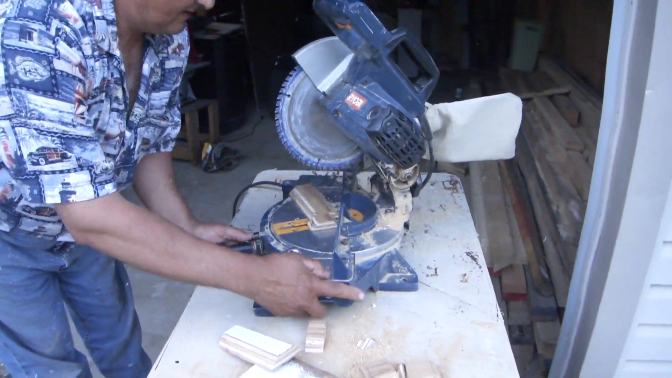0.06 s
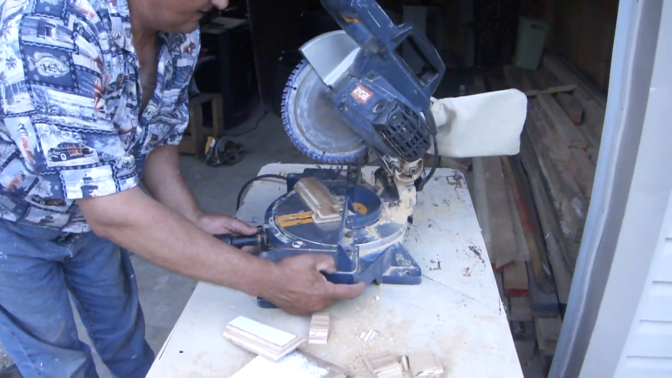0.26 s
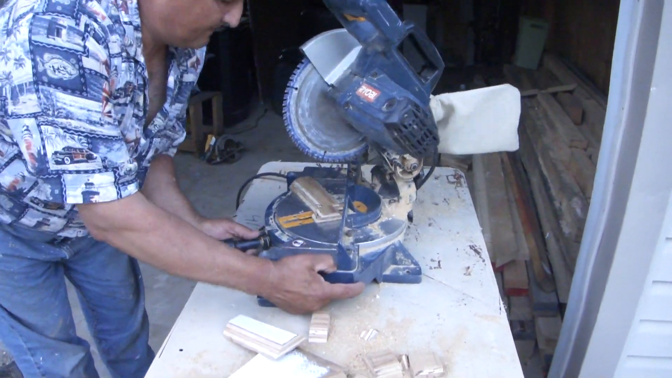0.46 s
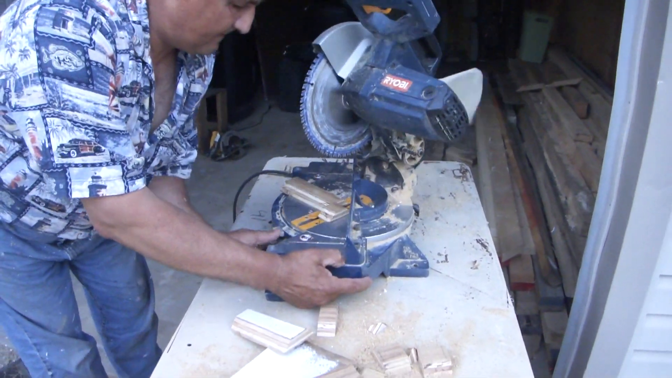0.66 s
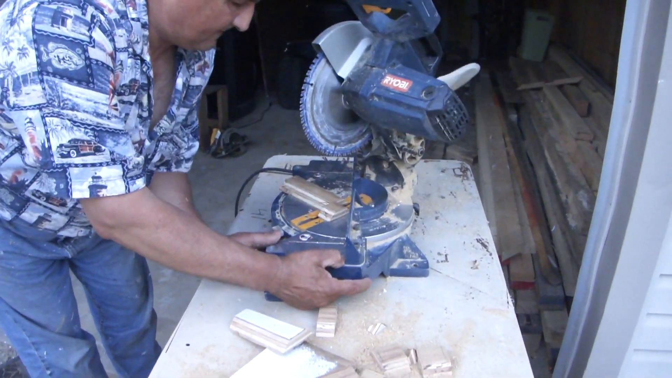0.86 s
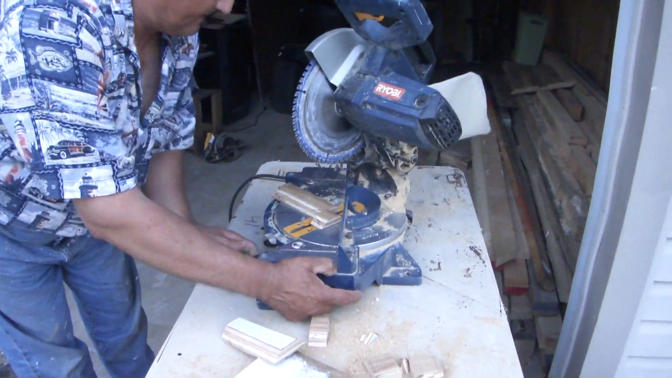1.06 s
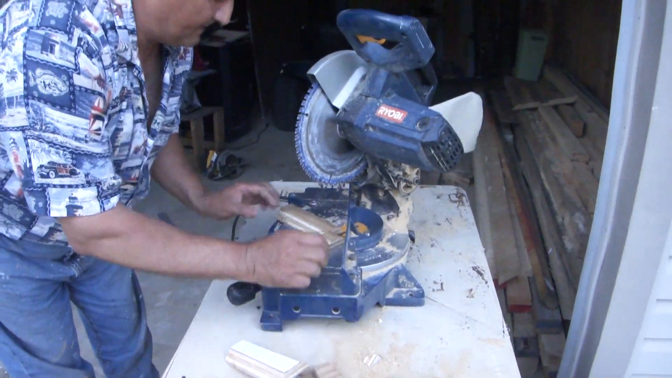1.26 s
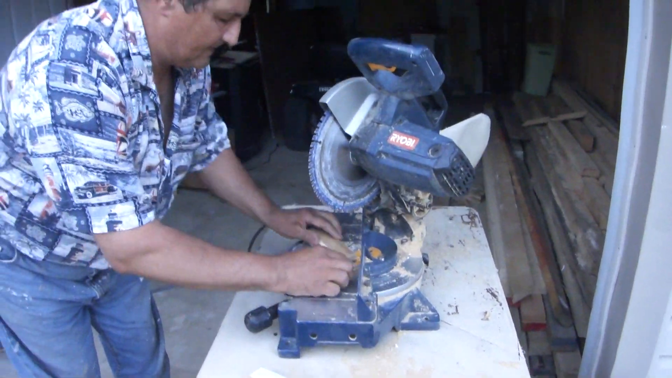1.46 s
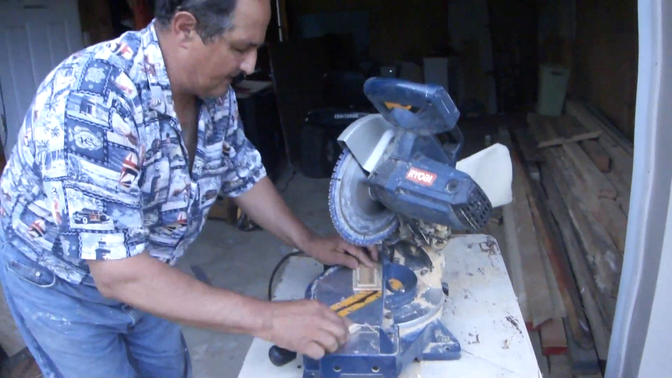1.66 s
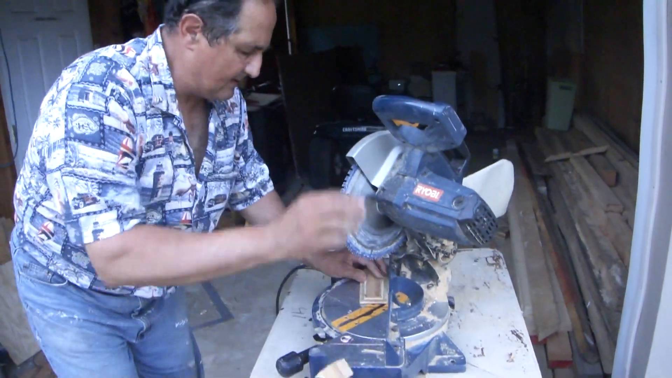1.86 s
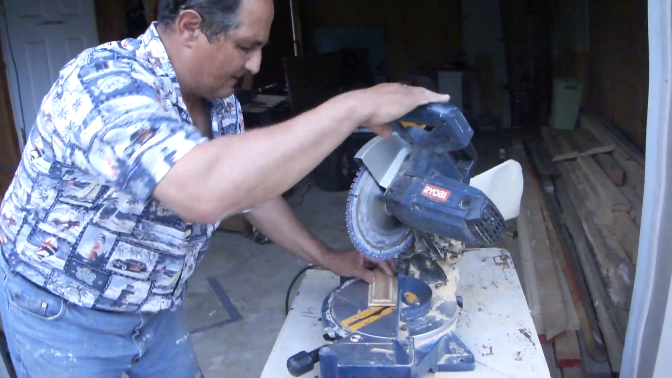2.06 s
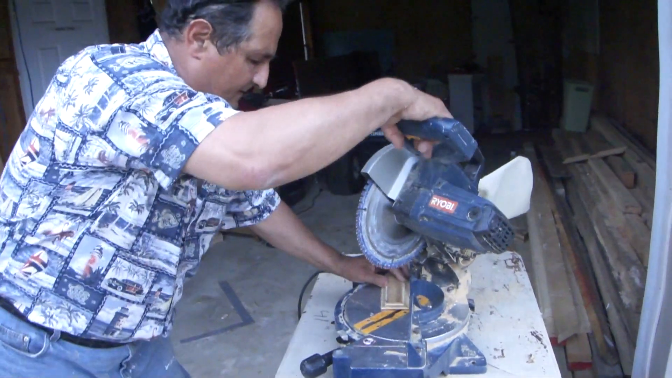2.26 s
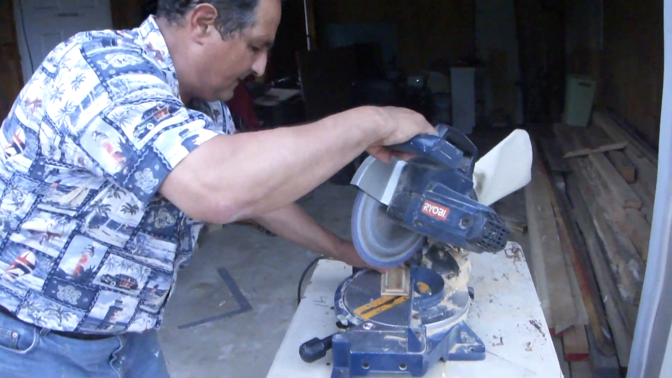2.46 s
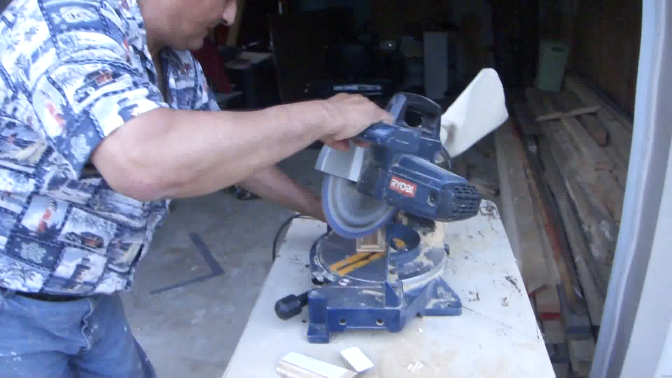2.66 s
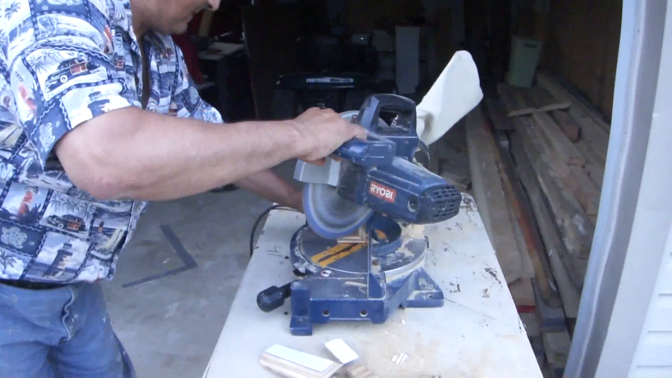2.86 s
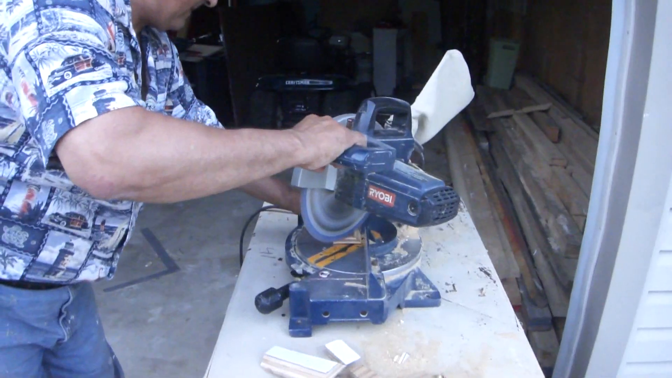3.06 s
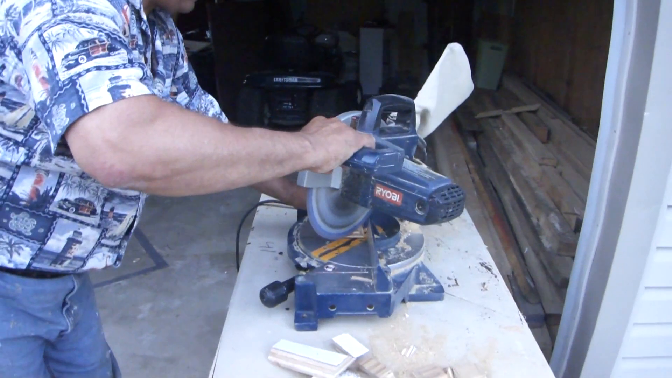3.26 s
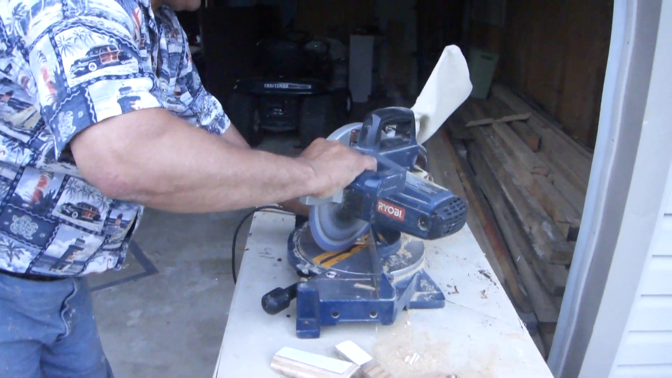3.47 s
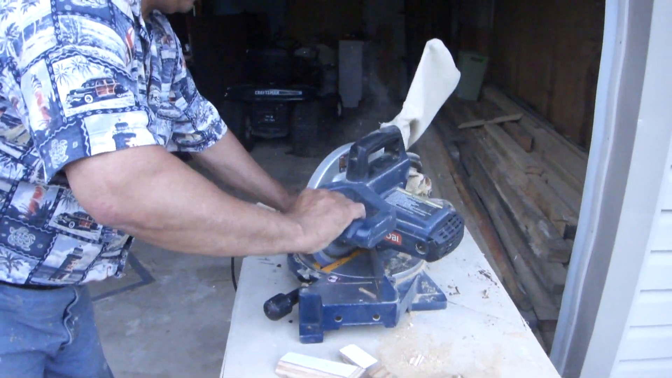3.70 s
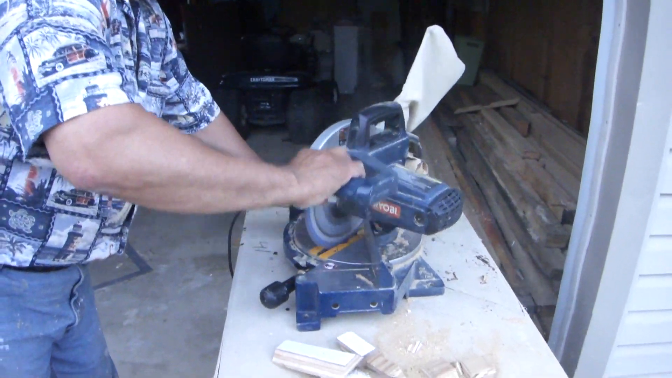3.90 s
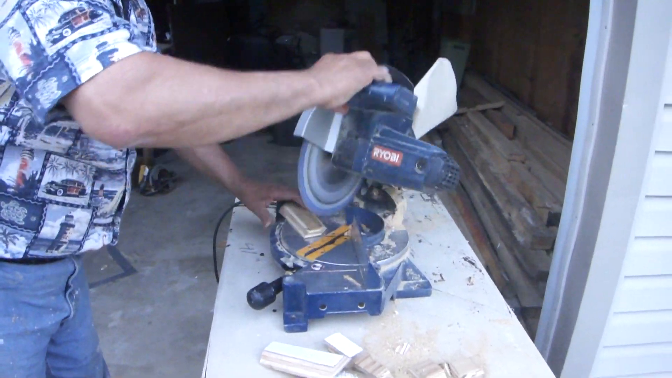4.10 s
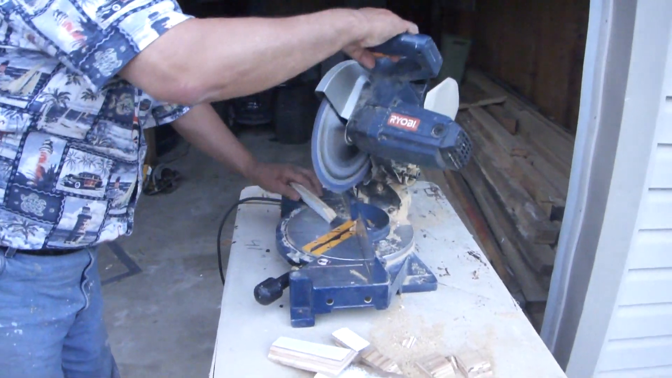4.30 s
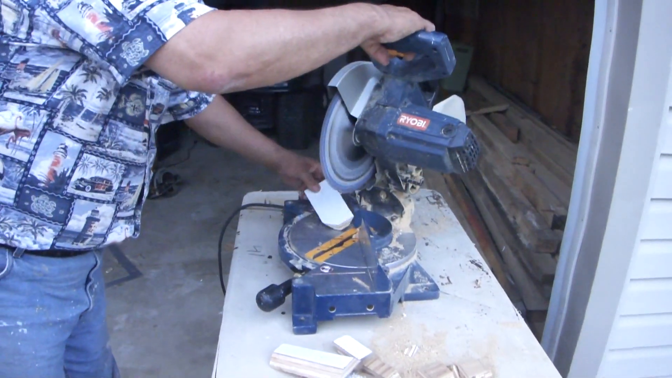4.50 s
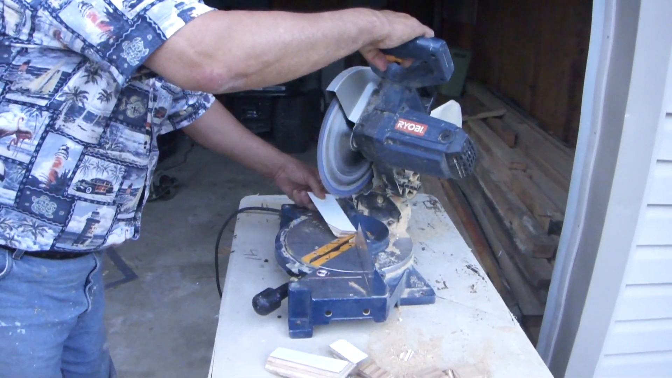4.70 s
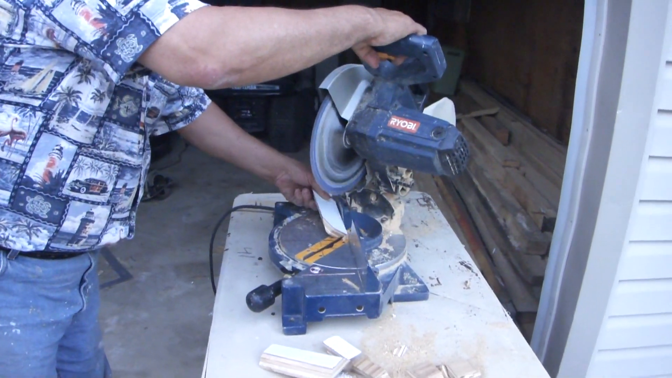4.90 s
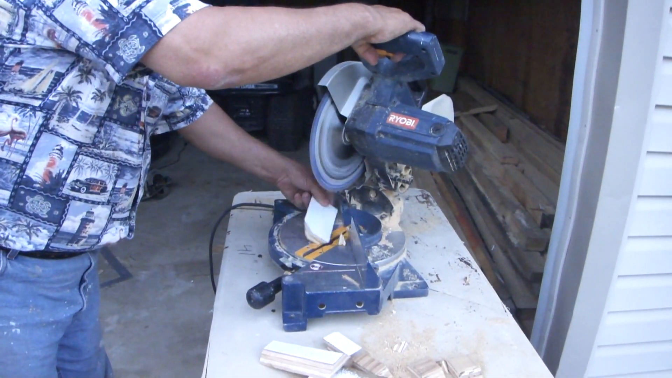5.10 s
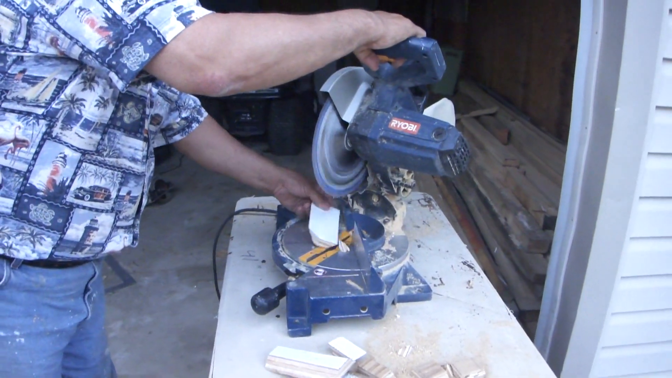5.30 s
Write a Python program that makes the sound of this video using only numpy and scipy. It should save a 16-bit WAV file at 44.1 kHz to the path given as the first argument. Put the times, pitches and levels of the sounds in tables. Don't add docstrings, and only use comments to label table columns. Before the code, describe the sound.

In a garage with its door open to faint traffic, a heavy tool base knocks and scrapes over a bench. A sharp clack, then an electric mitre saw starts with a rough growl and rising whine, bites briefly through a small block, and brakes, its blade singing as it slows. Camera microphone a few steps away, dipping in level while the saw is loud.

```python
import sys
import numpy as np
from scipy import signal
from scipy.fft import rfft, irfft, next_fast_len
from scipy.io import wavfile
from scipy.ndimage import uniform_filter1d

SR = 44100
rng = np.random.default_rng(int(sys.argv[2]) if len(sys.argv) > 2 else 0)


def transcribe(signal):
    frames = np.atleast_2d(signal).T
    limited = np.clip(frames, -1, 1)
    pcm = np.round(limited * 32767).astype(np.int16)
    wavfile.write(sys.argv[1], SR, pcm)


def field_ratio(decibels):
    return 10 ** (np.asarray(decibels, dtype=float) / 20)


N = 235798
t = np.arange(N) / SR
SIZE = next_fast_len(N + SR)
FREQ = np.maximum(np.arange(SIZE // 2 + 1) * SR / SIZE, 1)

SWITCH_ON_S, BITE_S, BRAKE_S = 2.468, 3.47, 3.915
FREE_HZ = 350
# [f/Hz, width/Hz, level/dB]
HOUSING_MODES = [(550, 160, -4.5), (842, 47, 5.5), (1010, 73, 3.5), (1555, 46, -1), (2135, 62, 0),
                 (2420, 58, 2.5)]


def level(x):
    return x / np.sqrt(np.mean(x ** 2))


def colour(x, spectrum, share=1):
    hz, db = np.transpose(spectrum)
    gain = field_ratio(share * np.interp(np.log(FREQ), np.log(hz), db))
    return irfft(rfft(x, SIZE) * gain, SIZE)[..., :N]


def band_level(x, lo_hz, hi_hz):
    power = np.abs(rfft(x, SIZE)) ** 2
    in_band = (FREQ > lo_hz) & (FREQ < hi_hz)
    return level(x) * np.sqrt(power.sum() / power[..., in_band].sum())


def resonate(x, hz, width_hz):
    r = np.exp(-np.pi * width_hz / SR)
    return signal.lfilter([1 - r, 0, r - 1], [1, -2 * r * np.cos(2 * np.pi * hz / SR), r * r], x)


def walk(rate):
    k = max(int(SR / rate), 1)
    steps = np.repeat(rng.standard_normal(N // k + 1), k)
    return level(uniform_filter1d(uniform_filter1d(steps, k), k)[:N])


def curve(table, column, fade_s=0.002):
    s, db = np.array(table)[:, 0], np.array(table)[:, column]
    inside = np.clip(np.minimum(t - s[0], s[-1] + fade_s - t) / fade_s, 0, 1)
    return field_ratio(np.interp(t, s, db)) * inside


def grains(spread_db):
    return rng.standard_normal(N) * field_ratio(spread_db * walk(400))


def since(s, tau):
    return (t >= s) * np.exp(-np.maximum(t - s, 0) / tau)


def stroke(s, rise, fall):
    bend = 1.8
    return field_ratio(-20 * np.where(t < s, (s - t) / rise, (t - s) / fall) ** bend)


def yard():
    # [f/Hz, level/dB]
    yard_colour = [(15, -69), (25, -8), (159, -2), (322, -12.5), (366, -11.5), (528, -13), (617, -5),
                   (844, -11), (936, -5), (1090, -9.5), (1310, -6.5), (2270, -16), (3190, -21), (4840, -30),
                   (12700, -43.5), (16500, -88), (22000, -120)]
    # [f/Hz, width/Hz, level/dB]
    far_hum = [(157, 28, -8.5), (577, 0.68, -6)]
    mid = field_ratio(1.0 * walk(2.8)) * rng.standard_normal(N)
    side = 0.44 * rng.standard_normal(N)
    air = band_level(colour(np.array([mid + side, mid - side]), yard_colour), 72, 250)
    hum = sum(field_ratio(db) * level(resonate(mid, hz, width)) for hz, width, db in far_hum)
    return field_ratio(-40.5) * (air + hum)


def garage(x):
    dull_t60_s, hiss_t60_s = 0.085, 0.2
    u = np.arange(int(.6 * SR)) / SR
    noise = rng.standard_normal((2, len(u))) * (u > .004)
    dull = uniform_filter1d(noise, size=9)
    tail = 2 * dull * np.exp(-np.log(1000) * u / dull_t60_s)
    tail = tail + (noise - dull) * np.exp(-np.log(1000) * u / hiss_t60_s)
    tail = colour(tail / np.sqrt(np.sum(tail ** 2) / 2),
                  [(100, -7), (500, -9.5), (1500, -8.0), (5000, 0.0), (9000, 7.0), (11000, 6.0), (12000, 2)])
    return irfft(rfft(tail, SIZE) * rfft(x, SIZE), SIZE)[:, :N]


def scrapes():
    # [hardest t/s, build-up/s, let-go/s, body level/dB, grit level/dB]
    pushes = [(.6, 0.063, 0.13, -33.5, -32.5), (0.756, 0.094, 0.086, -20.5, -24),
              (0.841, 0.012, 0.11, -26, -38), (1.19, 0.18, 0.2, -38, -36),
              (1.545, 0.012, 0.049, -52, -33.5), (1.64, 0.078, 0.15, -38.5, -34.5),
              (1.77, 0.14, 0.088, -48, -38.5), (1.9, 0.12, 0.27, -44.5, -49.5),
              (2.085, 0.017, 0.086, -23.5, -69), (2.19, 0.071, 0.088, -42, -45),
              (2.3, 0.66, 0.83, -35.5, -46), (2.467, 0.039, 0.018, -40.5, -29.5)]
    # [t/s, f/Hz, width/Hz, level/dB]
    squeaks = [
        (1.556, 8400, 300, -44),
        (1.71, 7250, 300, -37),
        (1.765, 4750, 150, -41),
        (1.757, 9500, 350, -41),
        (1.78, 9200, 300, -44),
    ]
    # [f/Hz, level/dB]
    drag_colour = [(71, -53), (120, -10.5), (513, 4), (708, -12), (820, 7), (896, -2), (1500, -4),
                   (1980, -11), (2190, -10.5), (4000, -35), (5200, -51), (8800, -120)]
    # [f/Hz, level/dB]
    grit_colour = [(1470, 2), (2500, 5), (2920, 4), (4020, -4.5), (4700, -1), (6560, -4), (7320, -4.5),
                   (9940, -9), (12700, -19.5), (16500, -57), (22000, -120)]
    drag = band_level(colour(grains(3.0), drag_colour), 300, 2500)
    grit = band_level(colour(grains(2.7), grit_colour), 3640, 13000)
    out = 0
    for s, hz, width, db in squeaks:
        out = out + field_ratio(db) * stroke(s, .018, .018) * level(resonate(grit, hz, width))
    for s, rise, fall, body_db, grit_db in pushes:
        out = out + stroke(s, rise, fall) * (field_ratio(body_db) * drag + field_ratio(grit_db - 6.5) * grit)
    return out


def wood_knock(u, db, hz, crack_db):
    # [multiple of the body pitch, level/dB]
    wood = [(.62, -6), (1, 0), (1.37, -4), (1.9, -8), (2.7, -14)]
    fall = np.log(1000) * u / 0.083
    body = 0
    for multiple, mode_db in wood:
        detune = 1 + .04 * rng.standard_normal()
        tone = np.sin(2 * np.pi * hz * multiple * detune * u)
        body = body + field_ratio(mode_db) * tone * np.exp(-fall * multiple ** 1.1)
    noise = rng.standard_normal((3, len(u)))
    tail = level(resonate(resonate(noise[0], hz * 0.93, hz * 1.4), hz, hz * 0.91)) * np.exp(-fall * 0.61)
    blow = level(resonate(resonate(noise[1], 1760, 2000), 1700, 2000)) * np.exp(-u / 0.0032)
    crack = resonate(noise[2], 3200, 4400) * np.exp(-u / 0.0047)
    return field_ratio(db) * (0.43 * body + 0.5 * tail + 0.7 * field_ratio(0.21 * crack_db) * blow + 4 * field_ratio(crack_db) * crack)


def knocks():
    # [t/s, peak level/dB, body f/Hz, crack level/dB]
    wood_hits = [(0.09, -24.5, 450, -19), (0.506, -23.5, 427, -36), (0.537, -32, 650, -10),
                 (0.574, -28, 1390, -38), (0.594, -20.5, 1440, -45), (0.663, -22.5, 1450, -34.5),
                 (0.716, -37, 860, -16), (0.733, -14.5, 900, -1.5), (0.745, -9, 996, -30),
                 (0.754, -11, 1340, -14), (0.761, -8, 1150, -32), (0.773, -10, 870, -20),
                 (0.794, -8.5, 845, -15.5), (0.819, -13.5, 1010, -41), (0.83, -15.5, 1010, -35),
                 (0.854, -30, 433, -12), (1.096, -24, 827, -26), (1.1372, -7, 725, -36),
                 (1.218, -30, 700, -21), (1.236, -20, 617, -22), (1.522, -23, 457, -14),
                 (1.536, -34, 448, -36), (2.0654, -2, 523, -36), (2.155, -7.5, 570, -50),
                 (2.172, -17.5, 536, -18), (2.35, -11, 577, -99), (2.47, -7, 1018, -11.5),
                 (3.911, -14, 2116, -12), (4.678, -12, 1293, -28), (4.706, -31, 1210, -25)]
    # [f/Hz, level/dB, t60/s]
    latch_modes = [(3230, 13, 0.035), (3570, 10, 0.032), (4100, -6, 5.0), (5020, 12, 0.029),
                   (8199, -21, 0.034)]
    # [t/s, level/dB]
    latch_hits = [
        (0.733, -13.5),
        (1.137, -30),
        (2.156, -58),
    ]
    # [t/s, f/Hz, level/dB, decay/s]
    snaps = [(0.5042, 950, -16.5, 0.0013), (0.5377, 1100, -21, .001), (.664, 1420, -14.5, 0.004),
             (0.7517, 1300, -9, .002), (0.7603, 1210, -3.5, 0.0024), (0.796, 1840, -17, 0.0017),
             (0.8197, 910, -13, 0.0035), (0.858, 2780, -22, 0.0043), (1.1363, 875, -6.5, 0.0032),
             (1.1369, 2070, -7.5, 0.0027), (1.2155, 740, -21, 0.0044), (2.0651, 1840, -0.5, 0.0013),
             (2.1546, 7400, -12.5, 0.0005), (2.1555, 5550, -20, .001), (2.351, 900, -12, 0.0028),
             (4.6752, 1070, -8, 0.0043), (4.677, 2250, -10, .0016), (4.6768, 6000, -16, .0012),
             (4.7055, 1200, -10, 0.0019)]
    # [t/s, level/dB]
    ticks = [(1.538, -35), (1.632, -34), (1.678, -31), (1.741, -27), (1.8, -35), (1.84, -39), (1.985, -35)]
    out, u = np.zeros(N + SR), np.arange(SR // 3) / SR

    def add(s, sound):
        out[int(s * SR):int(s * SR) + len(u)] += sound

    for s, db, hz, crack_db in wood_hits:
        add(s, wood_knock(u, db, hz, crack_db))
    latch = 0
    for hz, db, t60 in latch_modes:
        fall = np.exp(-np.log(1000) * u / min(t60, 1 / 40))
        latch = latch + field_ratio(db) * np.sin(2 * np.pi * hz * u) * fall
    for s, db in latch_hits:
        add(s, field_ratio(db) * latch / 2)
    for s, hz, db, fall_s in snaps:
        add(s, field_ratio(db) * np.sin(2 * np.pi * hz * u) * np.exp(-u / fall_s))
    for s, db in ticks:
        tick = level(resonate(rng.standard_normal(len(u)), 7000, 6000))
        add(s, field_ratio(db) * tick * np.exp(-u / 0.0016))
    return signal.sosfilt(signal.butter(2, 190, "high", fs=SR, output="sos"), out[:N])


def rotor_speed():
    run_up = 275 * since(SWITCH_ON_S, .7)
    stall = 40 * since(SWITCH_ON_S, .1)
    sag = 22 * ((t >= BITE_S) - since(BITE_S, .12))
    powered = FREE_HZ - run_up - stall - sag
    crawl_hz, grab_hz = 21.6, 24
    slow_hz = powered[int(BRAKE_S * SR)] - crawl_hz - grab_hz
    braked = crawl_hz + slow_hz * since(BRAKE_S, .384) + grab_hz * since(BRAKE_S, .1)
    return np.where(t < BRAKE_S, powered, braked)


def motor_growl(turns):
    # [f/Hz, level/dB]
    growl_colour = [(35, -76), (60, -51), (112, -13.5), (301, -17.5), (360, -8), (674, -9.5), (987, -3),
                    (1410, -2.5), (4530, -15), (11100, -30), (12700, -66), (16500, -72), (22000, -120)]
    pulse = 1 + 0.22 * np.cos(2 * np.pi * 120 * t) * (t < BRAKE_S) + 0.2 * np.cos(2 * np.pi * turns)
    rough = colour(pulse * grains(0.62), growl_colour)
    modes = sum(field_ratio(db + 3.5) * resonate(rough, hz, width) for hz, width, db in HOUSING_MODES)
    return band_level(1.04 * rough + modes, 400, 1350)


def fan_air(rough_load):
    # [f/Hz, level/dB]
    air_colour = [(300, -17.5), (900, -8.5), (2000, 7), (3500, 3), (4700, 0), (6200, -3), (8300, -9.5),
                  (11500, -11), (13000, -27)]
    # [f/Hz, width/Hz, level/dB]
    vents = [(487, 60, 17.5), (4330, 10, 12), (4620, 67, 10.5), (7940, 790, 6), (8260, 450, -3)]
    air = colour(grains(1.0), air_colour)
    air = air + sum(field_ratio(db + 4.5 * walk(25)) * (1 - rough_load) * resonate(air, hz, width)
                    for hz, width, db in vents)
    return band_level(air, 3630, 17000)


def gear_whine(turns, speed_hz, rough_load):
    orders = [7.28, 12.75, 14.56, 21.84, 25.5, 29.1, 32.8, 36.4, 43.7, 51]
    # [level/dB, change under load/dB, extra power of braking speed, roughness]
    gears = [(-1, -5, 0, 1.2), (-5, 6, .55, 1.35), (-10, 17, .1, 1.5), (1, -40, 1.4, 1), (-9, -34, .2, 1),
             (-12, -36, .2, 1), (-16, -34, .2, 1), (-14, -38, .2, 1), (-10, -36, .3, 1), (-17, -34, .2, 1)]
    # [f/Hz, width/Hz, level/dB]
    gear_case = [(302, 12, 6), (430, 56, 6), (860, 120, 2.5), (1110, 21, 10.5), (1390, 75, 5.5),
                 (1920, 230, 7), (2550, 104, -1), (2870, 170, -0.5), (3690, 360, 0), (4630, 87, 9.5)]
    powered = t < BRAKE_S
    rocking = turns + .024 * walk(30)
    whine = 0
    for order, (db, load_db, fade, uneven) in zip(orders, gears):
        rate = 45 * order + 200
        shake = walk(rate) + 1j * walk(rate)
        beat = 1 + 0.11 * np.cos(2 * np.pi * (turns + rng.random()))
        beat = beat + .36 * np.cos(2 * np.pi * 120 * t) * powered
        blur = rough_load * np.where(powered, uneven, 1) + .16 * (t > BRAKE_S)
        blur = np.minimum(blur * (orders[0] / order) ** .6, .92)
        tone = (1 - blur + 0.54 * blur * shake) * np.exp(2j * np.pi * order * rocking)
        flutter_db = np.where(powered, 1.6, 2 + order / 14) * walk(30)
        slowing = np.where(powered, 1, (speed_hz / 250) ** fade)
        whine = whine + field_ratio(db + load_db * rough_load ** 2 + flutter_db) * beat * slowing * tone.real
    whine = colour(whine, [(200, -4.5), (350, -9.5), (600, -8.5), (900, 4.5), (1500, 0.5), (2000, 0.0),
                           (2800, 4.0), (4000, -3), (6500, -6), (9000, -18)])
    return whine + sum(field_ratio(db + 3.0) * resonate(whine, hz, width) for hz, width, db in HOUSING_MODES + gear_case)


def mains_hum():
    # [f/Hz, level/dB]
    mains = [(120, -33.5), (240, -34.5), (360, -50), (480, -31), (600, -33.5)]
    hum = sum(field_ratio(db) * np.sin(2 * np.pi * hz * t) for hz, db in mains)
    return hum * (t > 2.47) * np.exp(-np.abs(t - 2.47) / 0.7)


def motor(turns, speed_hz):
    # [t/s, share/1]
    load = [(2.47, 1), (2.8, .75), (3.3, .75), (3.42, .36), (3.9, .36), (3.93, .3), (4.4, .3), (5.35, .35)]
    rough_load = np.interp(t, *np.transpose(load))
    speed = speed_hz / FREE_HZ
    running = np.clip((t - SWITCH_ON_S) / 0.0019, 0, 1)
    pull = np.abs(np.gradient(speed)) * SR * (t > SWITCH_ON_S + .001)
    torque = 0.12 + uniform_filter1d(pull, size=441) / 2
    shield = uniform_filter1d(1. * (t > 3.37) * (t < 4.6), size=3000)
    puffs = field_ratio(-46) * since(SWITCH_ON_S, 0.11) + field_ratio(-17) * since(BRAKE_S, 0.011)
    brake_rub = field_ratio(-19) * since(BRAKE_S, 0.83)
    release_db = -6 * np.exp(np.minimum(t - BRAKE_S, 0) / .03)
    slack = (1 - since(SWITCH_ON_S, 0.14)) ** 2
    driven = field_ratio(-4.5 * shield + release_db) * speed ** 1.5 * slack
    braked = field_ratio(-2.5 - 6.7 * since(BRAKE_S, .012)) * speed ** 0.7
    mesh = np.where(t < BRAKE_S, driven, braked)
    growl = field_ratio(-11 - 7.5 * shield) * torque ** 0.36 * motor_growl(turns)
    air = (field_ratio(-9.5) * speed ** 0.86 + puffs + brake_rub) * fan_air(rough_load)
    whine = mesh * torque ** 0.31 * gear_whine(turns, speed_hz, rough_load)
    return running * (growl + air + whine + field_ratio(7.5 - 14 * shield) * mains_hum())


def blade_song(turns, speed_hz):
    # [t/s, level/dB]
    ring = [(3.64, -44), (3.88, -23), (4.05, -23), (4.25, -18), (4.45, -15), (4.7, -17), (4.85, -15.5),
            (5.35, -16.5)]
    # [f at rest/Hz, lowest wave/half orders, levels per wave/dB]
    blade = [(2931, -7, [-15, 2, -4, -2, 1, 0, -2, -17]), (3151, -4, [-2, 0, -14, -2, -7, -6, -18]),
             (3256, 3, [-10])]
    # [f/Hz, level/dB]
    guard = [(2550, -15.5), (2700, 8), (2900, 1), (3100, 3), (3300, 3), (3500, 11.5), (3750, -20)]
    stiff = np.cumsum(1.3e-4 * speed_hz ** 2) / SR
    song = 0
    for hz, lowest, waves in blade:
        lag = .97 - .9 * (hz - blade[0][0]) / 1000
        for k, db in enumerate(waves):
            order = np.round(lowest) / 2 + k
            inverted = .5 * (order < -.9)
            cycles = hz * t + stiff + order * (turns + lag) + inverted
            flutter_db = 1.5 * walk(70) + np.clip(speed_hz / 60, 0, 1.4) * walk(12)
            far_db = -13 * speed_hz / FREE_HZ * (abs(order - .75) - 1 / 4)
            drift = .07 * walk(9)
            song = song + field_ratio(db + flutter_db + far_db) * np.sin(2 * np.pi * (cycles + drift))
    return curve(ring, 1, 0.034) * field_ratio(-7.5) * colour(song, guard)


def wobble(hz, width_hz):
    return field_ratio(2.0 * walk(49)) * np.sin(2 * np.pi * np.cumsum(hz + width_hz * walk(30) / 2) / SR)


def cut(turns):
    # [t/s, level/dB]
    feed = [(3.34, -19.5), (3.39, -15.5), (3.44, -22), (3.52, -16.5), (3.62, -17.5), (3.72, -15.5),
            (3.76, -19.5), (3.8, -23.5), (3.86, -24)]
    # [f/Hz, width/Hz, level/dB, loudest t/s, lasting/s]
    teeth = [(4200, 60, -5, 3.7, .15), (4640, 30, -6, 3.64, .08), (4871, 20, 3, 3.39, .05),
             (4950, 25, -1, 3.49, .06), (4920, 30, -3, 3.68, .05), (5170, 30, -3, 3.39, .05),
             (5268, 16, -2, 3.58, .12), (5290, 20, 1, 3.72, .04), (5390, 25, -1, 3.76, .03),
             (5358, 14, -2, 3.47, .07), (6300, 40, -5, 3.57, .06), (5790, 25, -3, 3.58, .08),
             (6181, 22, -1, 3.41, .1), (6468, 20, -2, 3.63, .08), (6890, 30, -8, 3.55, .2),
             (7164, 16, -3, 3.47, .12), (8173, 16, 1, 3.38, .06), (8310, 30, -4, 3.53, .08),
             (8493, 14, 2, 3.68, .08), (9254, 20, 0, 3.69, .1), (9533, 16, -6, 3.72, .06),
             (9890, 14, -6, 3.62, .12), (10179, 16, 2, 3.73, .05), (10310, 20, -5, 3.45, .12),
             (10600, 50, -5, 3.6, .1), (11200, 30, -9, 3.76, .08), (11700, 90, -9, 3.5, .2)]
    # [f/Hz, level/dB]
    chip_colour = [(880, -45), (1500, -35), (2050, -26), (3150, -23), (5100, -11), (7560, 0), (8340, -4),
                   (10500, -5), (12700, -11), (16500, -51), (22000, -120)]
    bite = (1 + .5 * np.cos(2 * np.pi * turns / 4)) * grains(0.28)
    modes = 0
    for hz, width, db, s, span in teeth:
        swell = field_ratio(db - 16.5 * np.minimum(((t - s) / span) ** 2 / 3, 1))
        modes = modes + swell * (level(resonate(bite, hz, 2 * width)) + .6 * wobble(hz, width))
    chips = band_level(colour(bite, chip_colour), 3900, 12000)
    return curve(feed, 1, 0.0015) * (0.47 * modes + 0.3 * chips)


def camera_gain():
    # [t/s, level/dB]
    gain = [(.75, 0), (.95, -0.5), (1.3, -0.5), (2.42, -1), (2.6, -3), (2.87, -10), (3.2, -11.5),
            (3.5, -16), (4.25, -17.5), (4.66, -12), (5.2, -9.5), (5.35, -8.5)]
    return field_ratio(np.interp(t, *np.transpose(gain)))


def scene():
    # [f/Hz, left minus right level/dB]
    balance = [(100, -2.5), (1000, -3.5), (2500, -1), (4500, -2), (8500, -4), (12000, 0)]
    gain = camera_gain()
    speed_hz = rotor_speed()
    turns = np.cumsum(speed_hz) / SR
    near = gain * motor(turns, speed_hz) + blade_song(turns, speed_hz) + cut(turns) + scrapes() + knocks()
    left, right = near + field_ratio(-11.0) * garage(near) + gain ** 1.01 * yard()
    return np.array([colour(left, balance, .5), colour(right, balance, -.5)])


def roll_off(x):
    return signal.sosfilt(signal.butter(12, 12840, fs=SR, output="sos"), x)


def record(dry):
    rounded = np.tanh(0.78 * dry) / 0.82
    cut_bass = signal.sosfilt(signal.butter(2, 140, "high", fs=SR, output="sos"), rounded)
    cut_top = signal.sosfilt(signal.ellip(5, .5, 35, 12200, fs=SR, output="sos"), cut_bass)
    return roll_off(np.clip(cut_top, -1, 1))


dry = scene()
out = record(dry)
transcribe(out)
```